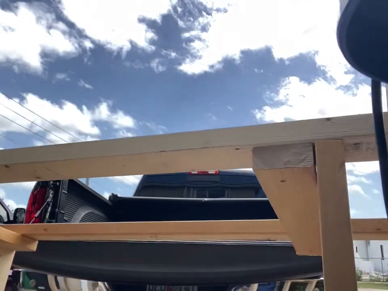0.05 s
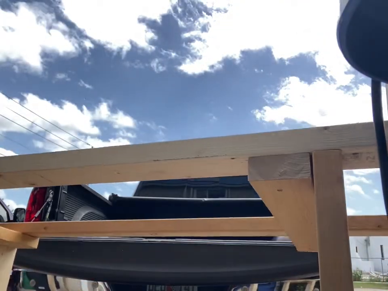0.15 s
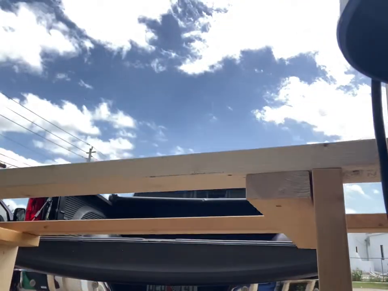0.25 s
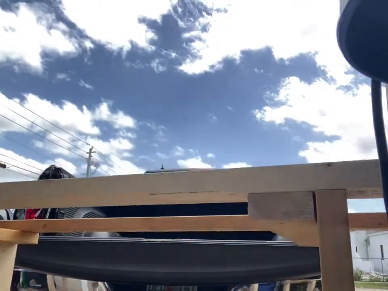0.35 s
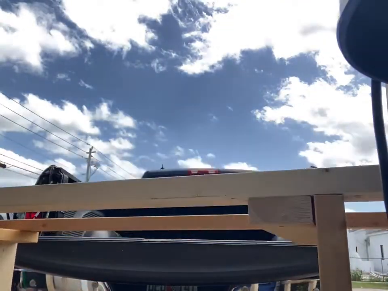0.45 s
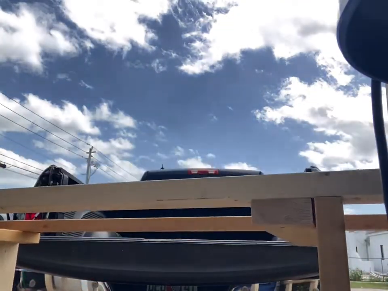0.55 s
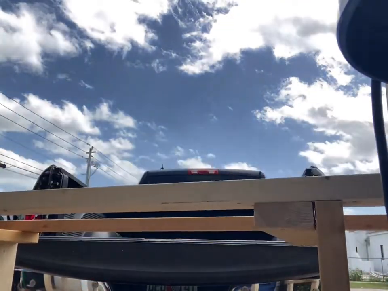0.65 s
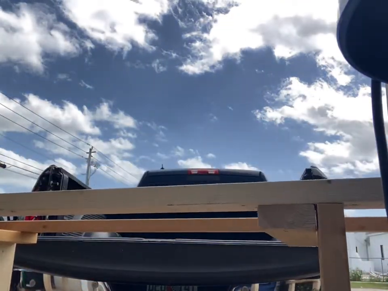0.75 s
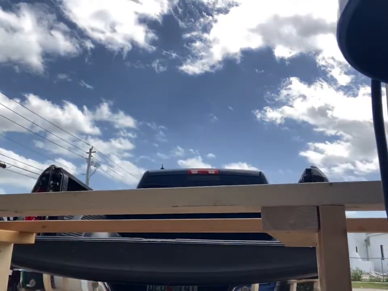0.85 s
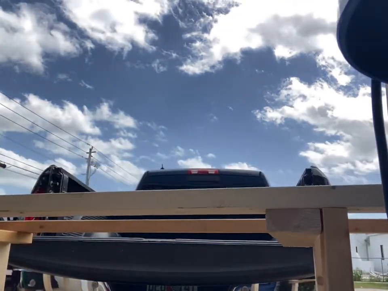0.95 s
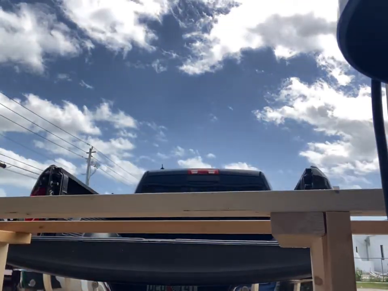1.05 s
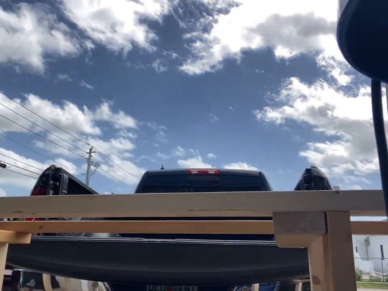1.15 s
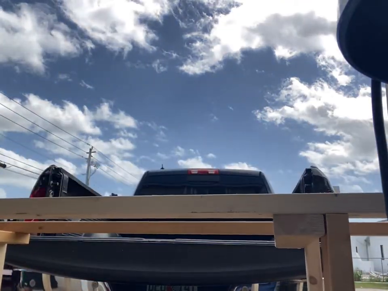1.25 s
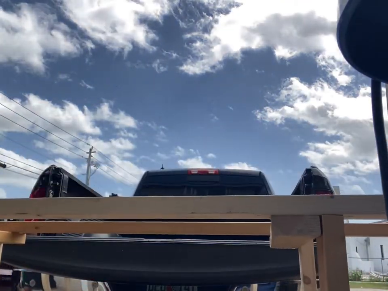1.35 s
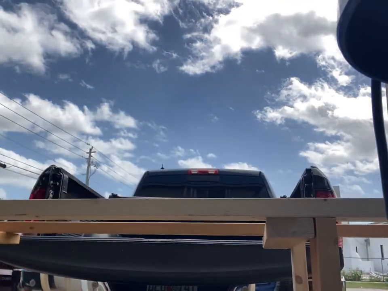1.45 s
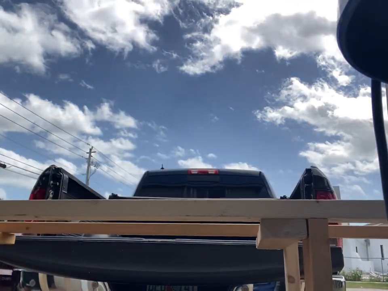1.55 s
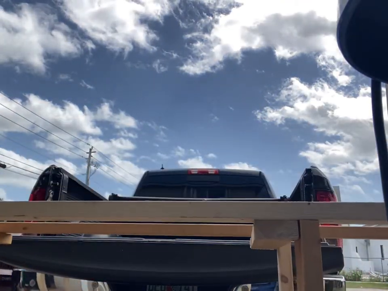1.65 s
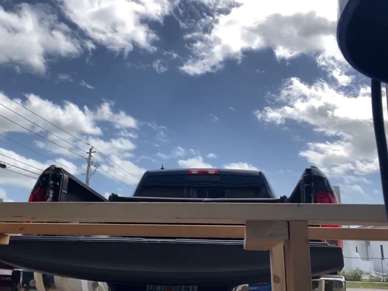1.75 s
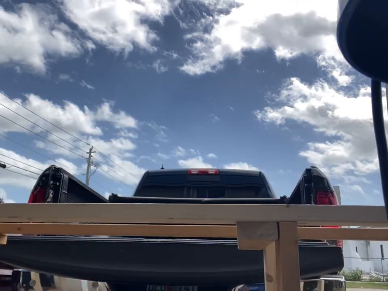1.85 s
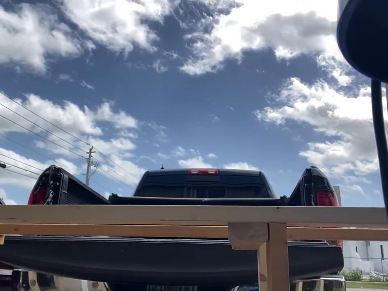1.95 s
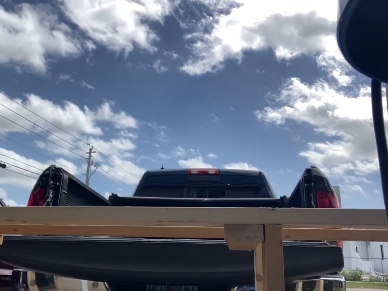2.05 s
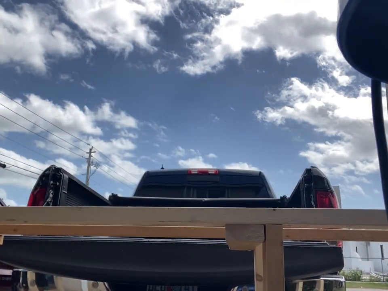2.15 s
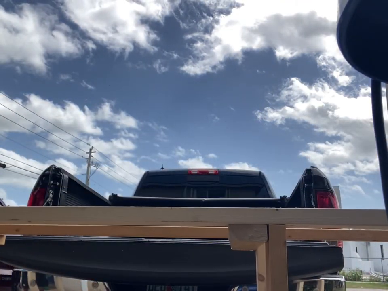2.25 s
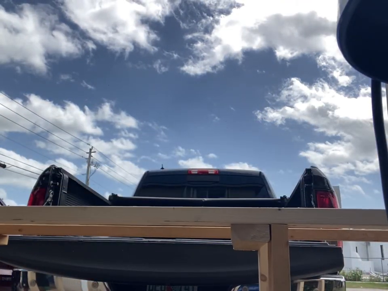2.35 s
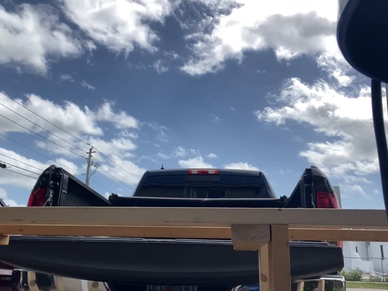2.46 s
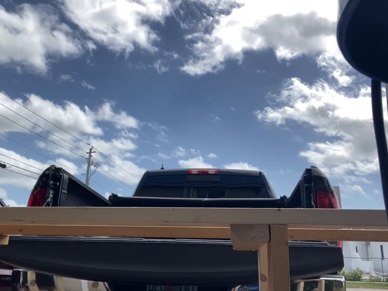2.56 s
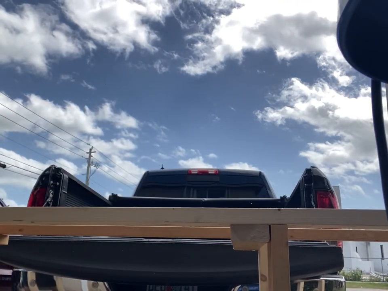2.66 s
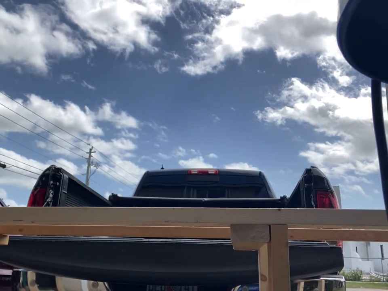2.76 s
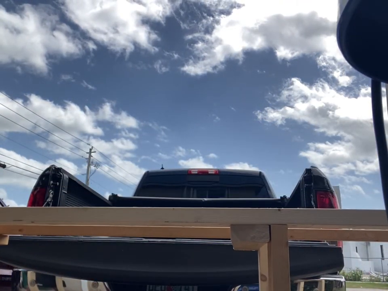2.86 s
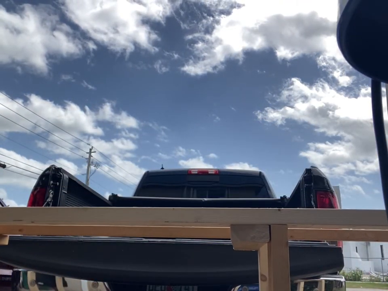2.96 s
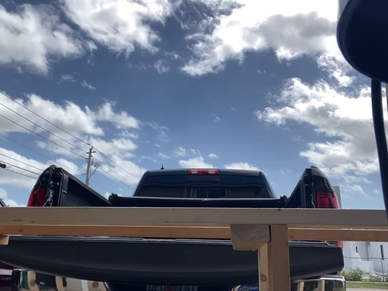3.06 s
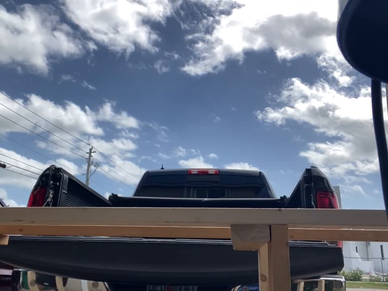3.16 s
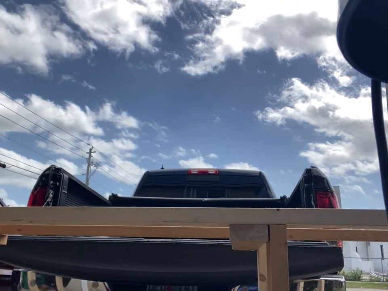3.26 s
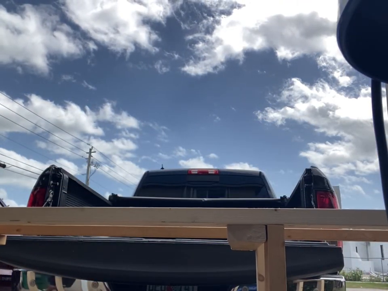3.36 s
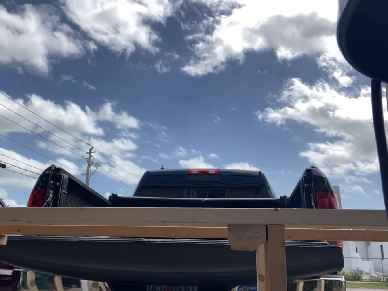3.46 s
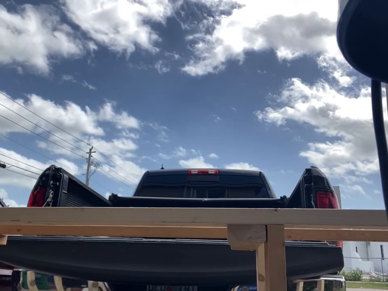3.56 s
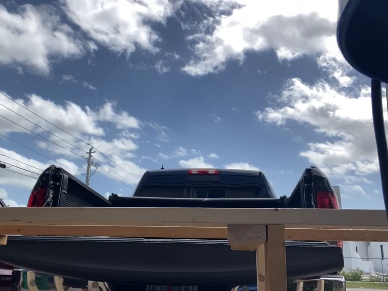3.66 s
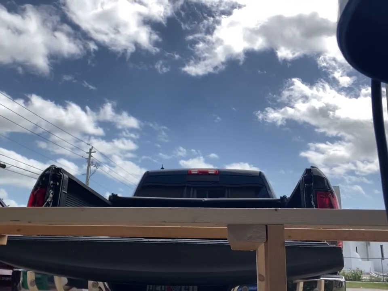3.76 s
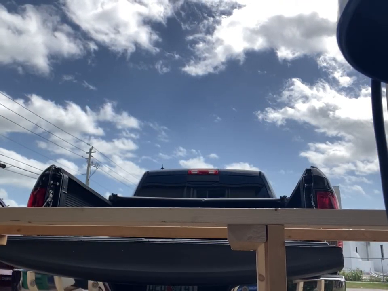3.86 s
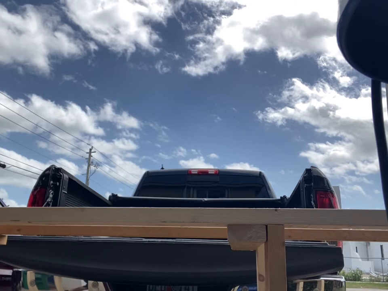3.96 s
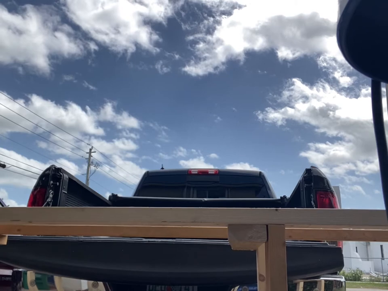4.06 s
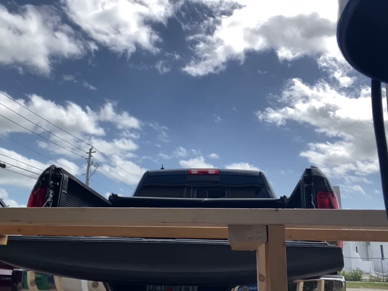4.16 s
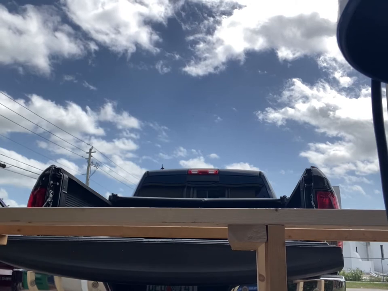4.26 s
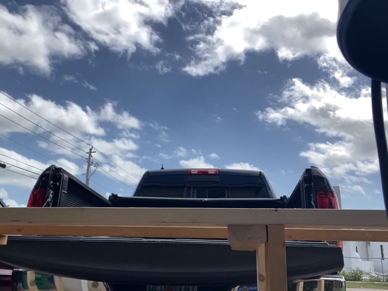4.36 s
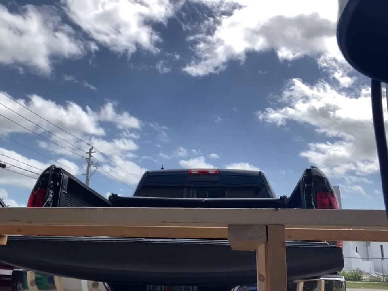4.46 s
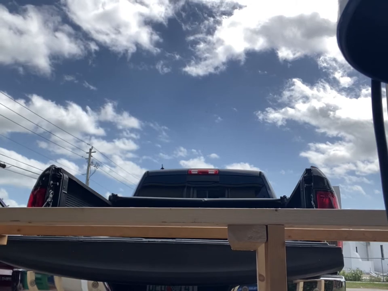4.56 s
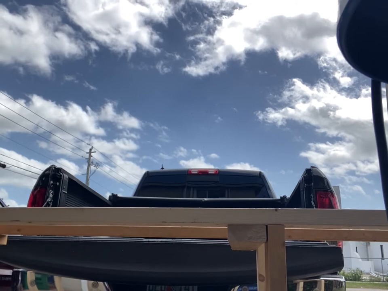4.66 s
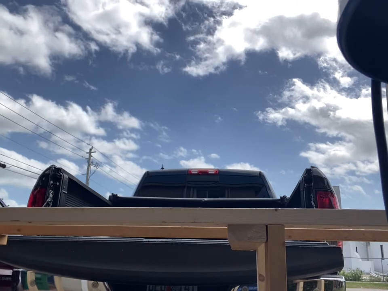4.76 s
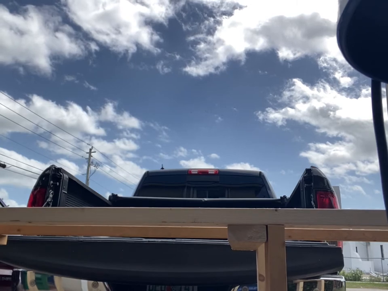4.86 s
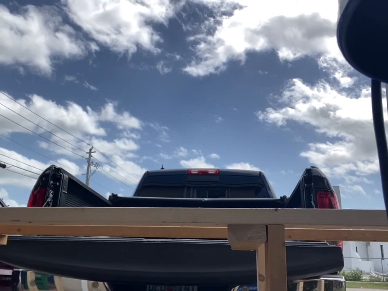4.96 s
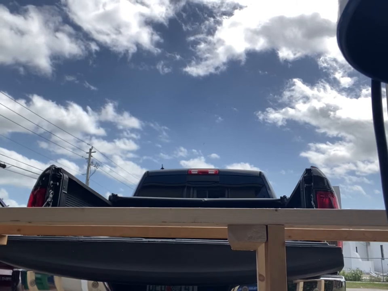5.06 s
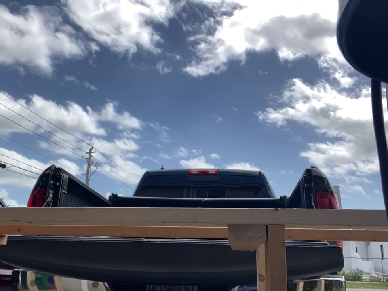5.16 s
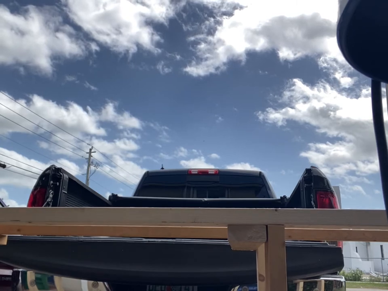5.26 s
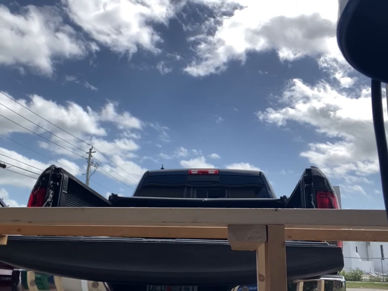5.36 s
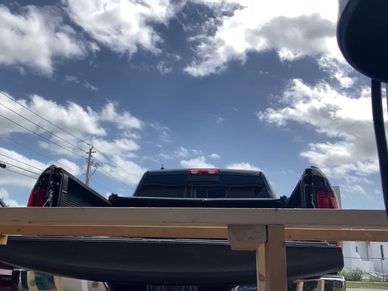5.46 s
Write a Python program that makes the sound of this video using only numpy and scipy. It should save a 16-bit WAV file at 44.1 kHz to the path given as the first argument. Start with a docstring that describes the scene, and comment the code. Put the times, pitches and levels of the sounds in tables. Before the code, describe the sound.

Outdoors over a low engine hum, timber bangs and rattles sharply, falls quiet, then gives a brief softer cluster of knocks.

```python
"""In a yard beside an idling engine, a timber frame is lowered from a truck's tailgate and settles in knocks.
After a pause it is nudged once more; something small and hard taps close to the microphone.
Blows are shaped noise plus decaying board modes over a hollow thud; taps are short rings with a noise tick.
Scrapes are trains of tiny blows, bumps are dull low rings, and the engine is a few wavering sines.
The steady outdoor wash is filtered noise whose bands swell separately."""
import sys
import numpy as np
from scipy import signal
from scipy.fft import rfft, irfft, next_fast_len
from scipy.io import wavfile
from scipy.ndimage import uniform_filter1d

SR = 44100
rng = np.random.default_rng(int(sys.argv[2]) if len(sys.argv) > 2 else 0)


def generate_wav(signal):
    """Clip the signal to [-1, 1] and save it as 16-bit WAV at the path in sys.argv[1]."""
    frames = np.transpose(np.atleast_2d(signal))
    scaled = np.clip(frames, -1, 1) * 32767
    pcm = np.round(scaled).astype(np.int16)
    wavfile.write(sys.argv[1], SR, pcm)


N = 242983
TIME = np.arange(N) / SR

# engine tones: pitch_hz, level_db (rms before swell, throb and port balance)
ENGINE_TONES = [(78.3, -47), (116.5, -44.5), (158, -48.5), (236, -47)]
# swell of the engine's highest tone: time_s, gain_db
HIGH_TONE_SWELL = [(0, -1.5), (2.3, -1.5), (2.55, 3.5), (3.2, 3), (3.9, 1), (4.6, 2), (5.1, -10.5),
                   (5.5, 0)]
# spectrum of the exhaust rumble: frequency_hz, relative_density_db (per Hz)
EXHAUST_SPECTRUM = [(12, -56), (22, -39), (36, -7), (55, 0), (70, 2), (118, -4), (140, -5), (190, -3),
                    (240, -4.5), (290, -7.5), (400, -12), (780, -55), (2000, -97.5)]
# spectrum of the airy wash: frequency_hz, relative_density_db (per Hz)
AIR_SPECTRUM = [(250, -4.5), (410, -0.5), (520, 2), (630, 4), (780, 1), (1100, 0), (1650, -2.5),
                (2000, -10.5), (2400, -15.5), (4200, -21.5), (6000, -25.5), (7800, -26.5), (9400, -33.5),
                (13000, -39.5), (14200, -56), (16000, -80)]
# slow swells of the wash bands: time_s, deep_rumble_db, upper_rumble_db, low_middle_db, middle_db (gains)
WASH_SWELLS = [(0, -39, -36.5, -34.5, -33.5), (.6, -34.5, -40, -34, -34.5), (1.4, -34.5, -35, -36.5, -35.5),
               (1.95, -36, -39, -32.5, -31), (2.35, -35, -38.5, -37, -39), (2.9, -37.5, -32.5, -35, -36.5),
               (3.25, -35, -39.5, -35, -36), (3.6, -36, -37.5, -34.5, -35),
               (3.85, -36.5, -38.5, -35, -37.5), (4.35, -39, -38.5, -37.5, -38),
               (4.8, -37.5, -38.5, -36.5, -39.5), (5.15, -39, -39.5, -37.5, -41.5),
               (5.5, -38, -40, -38, -40)]
# wash at the two ports: frequency_hz, likeness (0 to 1)
WASH_LIKENESS = [(30, 0.48), (170, 0.79), (400, 0.6), (600, 1), (1100, 0.2), (1600, 0.6), (2200, 0.09),
                 (7500, 0.14), (9300, 1), (13000, 0.83)]
# wash at the two ports: frequency_hz, left_minus_right_db
WASH_LEAN = [(30, 0.5), (230, 4), (480, -3.5), (1100, 5.5), (1900, 2.5), (4600, 6.5), (6100, 3), (7800, 4),
             (9200, -1)]
# wash at the two ports: frequency_hz, left_lead_rad
WASH_PHASE = [(0, 0), (200, 0.27), (600, 2.5), (800, 3.5), (1460, 1.83), (1900, 2), (3620, -4.5),
              (6120, -10.5), (6600, -10), (7580, -16.5), (8800, -18.5), (9900, -16), (11100, -12.5),
              (13000, -11.5)]
# frame at the two ports: frequency_hz, likeness (0 to 1)
FRAME_LIKENESS = [(100, 1), (400, 0.53), (7000, 0.12), (9300, 0.99), (13000, 0.27)]
# frame at the two ports: frequency_hz, left_minus_right_db
FRAME_LEAN = [(260, 10), (450, -2), (900, -1.5), (1400, 2), (2700, 1.5), (4000, 3.5), (5200, 4.5),
              (6500, -1), (7500, 2.5), (12000, -1)]
# frame at the two ports: frequency_hz, left_lead_rad
FRAME_PHASE = [(50, 0.2), (400, 0), (750, 2.5), (1400, 2.5), (2500, .5), (4200, -3.5), (5200, -8),
               (6200, -12.5), (9300, -8.5), (12000, 0), (13200, -14), (14000, -4)]
# blows on the frame: start_s, strength_db, extra_crack_db,
# thud_weight_db (relative to the blow, before the thud gain), thud_pitch_hz, contact_rise_s
KNOCKS = [(0.2456, -16, 5.5, -6.5, 392, 0.0018), (0.3437, -8, 3.5, -12.5, 470, 0.0014),
          (0.401, -26.5, 0, -12, 630, .002), (0.422, -25, -7, -15, 660, .002),
          (0.45, -26.5, 3, -24, 600, .003), (0.478, -20.5, -3, -13, 470, 0.0037),
          (0.5961, -15.5, -3.5, -20.5, 519, .004), (0.6104, -20, 1, -6.5, 626, 0.003),
          (0.797, -30, 2, -11, 560, .003), (0.8945, -18, 7.5, -11.5, 560, 0.0023),
          (0.982, -16, -0.5, -7.5, 397, 0.0012), (1.3553, -23.5, 6.5, -11, 620, 0.00098),
          (1.4663, -19.5, -10, 1.5, 484, 0.0025), (1.4864, -20, 2.5, -5, 603, 0.0065),
          (1.7789, -17.5, 9, -19, 434, 0.0013), (1.9108, -14, 3.5, -19.5, 496, .003),
          (1.928, -13, 4, -17.5, 649, 0.0021), (3.341, -38.5, -2, 1, 593, .003),
          (4.0004, -33, 21.5, -5, 282, .003), (4.0148, -27.5, -10, 1.5, 446, .004),
          (4.0471, -25, -3, -7, 580, 0.0045), (4.088, -18, 3, -10.5, 430, 0.0017),
          (4.126, -29.5, -2, -6.5, 434, 0.0022), (4.149, -31, 3, -10, 560, .002),
          (4.219, -32.5, 7, -10, 510, 0.0023), (4.283, -36.5, -9, -15, 450, 0.0026)]
# resonances of the boards: pitch_hz, relative_level_db, t60_s
BOARD_MODES = [(171, -7, 0.16), (503, -5, 0.14), (637, -7.5, 0.34), (982, -5, 0.18), (1104, -1, 0.23),
               (1666, -6, 0.11), (1857, -1.5, 0.13), (2037, 1.5, 0.091), (2737, -2, 0.085),
               (2980, -4, 0.055), (3270, -7, 0.13), (3850, -12, 0.23), (4220, -9, 0.14), (4300, -8, 0.16),
               (4660, -5, 0.16), (5350, -8, .14), (5700, -15, .13), (6190, -12, 0.079), (6660, -3, 0.088),
               (6900, -4, 0.097)]
# the wood's dense ring between those resonances: frequency_hz, relative_density_db (per Hz)
WOOD_SPECTRUM = [(60, -19), (160, 11.5), (450, 13.5), (750, 10.5), (1100, 7.5), (1650, 5.5), (2400, 0.5),
                 (4200, 4), (5300, 1), (6800, -1), (8200, -4.5), (9400, -22), (11000, -13), (13500, -29),
                 (16000, -44)]
# soft, dull bumps: start_s, level_db, pitch_hz, t60_s
BUMPS = [(.358, -23.5, 194, 0.16), (1.003, -22, 344, 0.093), (1.01, -23, 174, 0.17),
         (1.29, -26.5, 115.7, 0.67), (2.02, -34, 378, 0.069), (3.343, -35, 330, 0.081),
         (4.553, -27.5, 240, 0.11)]
# close taps: start_s, ring_db (before port gains), ring_pitch_hz, overtone_pitch_hz,
# overtone_db (relative to the ring), body_db (relative to the ring), tick_db (gain), jolt_db (strength)
TAPS = [(0.4876, -19.5, 975, 2000, -9, -7, -52, -28.5), (0.617, -26.5, 1054, 1480, -7, 0, -51, -27),
        (0.699, -22.5, 995, 2000, -8, -4, -61, -26), (0.716, -25.5, 985, 2020, -10, 0, -54, -26.5),
        (0.812, -26.5, 1010, 1680, -8, -6, -58, -31.5), (0.905, -16.5, 980, 1690, -10, -7, -46, -22.5),
        (0.984, -19, 1035, 1660, -9, 1, -46, -27), (1.054, -25.5, 1002, 1980, -12, 0, -58, -29),
        (1.188, -26.5, 1000, 2050, -14, -10, -68, -30), (1.361, -26.5, 1078, 1610, -2.5, -1, -54, -34),
        (1.454, -23.5, 960, 1710, -9, -5, -56, -27), (1.466, -19.5, 925, 1690, -12, -3, -50, -23),
        (1.501, -17.5, 1004, 1390, -12, -7, -47.5, -25), (1.665, -18, 990, 1610, -13, -15, -49, -26),
        (1.7166, -24, 1000, 1860, -20, 1.5, -50, -23.5), (1.791, -14, 1007, 2050, -17, -7.5, -44, -26),
        (1.875, -18, 1035, 2070, -18, -4, -47.5, -27), (1.931, -30, 1080, 2070, 7, -8, -50, -29),
        (1.949, -21, 1063, 2080, -8, -15, -58, -27), (1.962, -22.5, 1090, 1880, -10, -14, -60, -27),
        (2.043, -29.5, 1020, 2050, -11, -4, -66, -30), (2.117, -29, 1035, 1610, -16, -9, -60, -28),
        (2.258, -28.5, 1100, 1700, -11, -9, -68, -33.5), (4.004, -45, 910, 1780, -6, 9, -47, -40),
        (4.056, -24, 1080, 1500, -5, -16, -55, -31), (4.091, -22, 1115, 1630, -5, -19, -53, -24),
        (4.159, -24.5, 990, 1640, -7.5, -8, -53, -27)]
# spectrum of a tap's snap: frequency_hz, relative_density_db (per Hz)
TICK_SPECTRUM = [(200, 4), (700, 21), (1500, 16), (3000, 14), (6000, 2.5), (8200, 6.5), (9600, -4),
                 (11000, 2), (13300, 0.5), (15800, -19)]
# wood dragging on wood: start_s, length_s, level_db (rms before the ports), treble_db
SCRAPES = [(1.913, 0.081, -37.5, -3), (4.011, .075, -43.5, -21)]


def amp(db):
    """Decibel definition: 20 dB is a tenfold amplitude ratio."""
    return 10 ** (np.asarray(db) / 20)


def evened(x):
    """Power normalisation: scales to rms 1."""
    return x / np.sqrt(np.mean(x ** 2) + 1e-20)


def read(points, hz):
    """Logarithmic interpolation: joins (Hz, value) points on a log-frequency axis."""
    f, value = np.transpose(points)
    return np.interp(np.log(hz + 1), np.log(f + 1), value)


def add(mix, s, sound):
    """Superposition: mixes a stereo sound in at time s."""
    part = mix[:, max(round(s * SR), 0):][:, :sound.shape[1]]
    part += sound[:, :part.shape[1]]


def colour(x, points, size=2048):
    """Minimum phase: a causal filter whose phase follows from its (Hz, dB) response."""
    log_gain = np.log(amp(read(points, abs(np.fft.fftfreq(size, 1 / SR)))))
    response = np.exp(np.conj(signal.hilbert(log_gain)))
    impulse = np.fft.ifft(response).real
    return signal.oaconvolve(x, impulse[None], axes=1)[:, :x.shape[1]]


def drift(rate_hz, size=N):
    """Band-limited randomness: noise under a Gaussian low-pass, rms 1."""
    n = next_fast_len(size)
    spectrum = rfft(rng.standard_normal(n))
    lowpass = np.exp(-(np.fft.rfftfreq(n, 1 / SR) / rate_hz) ** 2)
    return evened(irfft(spectrum * lowpass, n)[:size])


def split(x, hz):
    """Complementary bands: zero-phase parts below and above hz that sum to the input."""
    below = signal.sosfiltfilt(signal.butter(3, hz, fs=SR, output="sos"), x)
    return below, x - below


def ports(pair, likeness, phase, lean):
    """Partial coherence: two unrelated signals become what two microphone ports pick up."""
    hz = np.fft.rfftfreq(N, 1 / SR)
    shared, separate = rfft(pair)
    same = np.clip(read(likeness, hz), 0, 1)
    lean_db = read(lean, hz)
    left = shared * np.exp(1j * np.interp(hz, *np.transpose(phase))) * amp(lean_db / 2)
    right = (same * shared + np.sqrt(1 - same ** 2) * separate) * amp(-lean_db / 2)
    return irfft(np.array([left, right]), N)


def at_frame(pair):
    """Spatial coherence of the frame's sound across the two ports."""
    return ports(pair, FRAME_LIKENESS, FRAME_PHASE, FRAME_LEAN)


def idle(wander=0.01187, throb_db=3.0, left_lead_s=0.00046):
    """Additive tones with random frequency and amplitude modulation, arriving first at the left port."""
    hum = np.zeros((2, N))
    swells = [0] * (len(ENGINE_TONES) - 1) + [np.interp(TIME, *np.transpose(HIGH_TONE_SWELL))]
    for (hz, db), swell_db in zip(ENGINE_TONES, swells):
        clock = np.cumsum(1 + wander * drift(6.0)) / SR + np.array([[left_lead_s], [0]])
        strength = np.sqrt(2) * amp(db + swell_db + throb_db * drift(10.7))
        hum += strength * np.sin(2 * np.pi * (hz * clock + rng.random()))
    return hum * amp([[.4], [-.6]])


def port_noise(points):
    """Filtered random noise: the outdoor spectrum at both ports, rms 1."""
    noise = colour(rng.standard_normal((2, N)), points, size=8192)
    return evened(ports(noise, WASH_LIKENESS, WASH_PHASE, WASH_LEAN))


def waver(x, depth_db=2.0):
    """Time-frequency modulation: narrow patches swell and fade, each on its own."""
    z = signal.stft(x, nperseg=1024, noverlap=768)[2]
    patches = rng.standard_normal(z[0].T.shape)
    patches = uniform_filter1d(patches, size=14, axis=0)  # over time frames
    patches = uniform_filter1d(patches, size=4, axis=1)  # over frequency bins
    gain = evened(amp(depth_db * evened(patches)))
    return signal.istft(z * gain.T, nperseg=1024, noverlap=768)[1][:, :N]


def outdoors(deep_swell_db=1.65, upper_swell_db=1.46, flutter_db=0.8, hiss_db=-53):
    """Band-wise modulation of noise: exhaust rumble and the airy wash of the yard."""
    s, *curves = np.transpose(WASH_SWELLS)
    deep_db, upper_db, low_db, middle_db = [np.interp(TIME, s, curve) for curve in curves]
    deep, upper = split(port_noise(EXHAUST_SPECTRUM), 113)
    rumble = deep * amp(deep_db + deep_swell_db * drift(10.0))
    rumble += upper * amp(upper_db + upper_swell_db * drift(5.1))
    air, hiss = split(port_noise(AIR_SPECTRUM), 2345)
    low, middle = split(evened(waver(air)), 890)
    wash = low * amp(low_db) + middle * amp(middle_db) + evened(hiss) * amp(hiss_db)
    return rumble + wash * amp(flutter_db * drift(12.4))


def knock(body_db, thud_db, crack_db, rise, t60, snap_db=10, snap_t60=0.018, dense_db=-1, modes_db=-9.5,
          yard_db=-19, yard_t60=0.67, bass_rise=0.0026, treble_life=0.94, chatter_db=1.0, grit_db=-1.5,
          grit_per_s=240):
    """Impact excitation of damped modes: a snap, a chattering ring, a faint tail off truck and yard."""
    t = np.arange(SR // 2) / SR
    low, high, sharp = rng.standard_normal((3, 2, len(t)))
    # the rough faces catch in tiny separate clicks
    grit = (rng.random(len(t)) < grit_per_s / SR) * rng.choice([-1, 1], high.shape)
    high = evened(high + amp(grit_db) * evened(grit))
    tail = amp(yard_db - 60 * t / yard_t60)
    # slow bending waves build up later and last longer than the treble
    bass = signal.lfilter(*signal.butter(2, 1600, fs=SR), low)
    bass *= (amp(-60 * t / t60) + tail) * (1 - np.exp(-t / bass_rise))
    treble = signal.lfilter(*signal.butter(2, 1600, "high", fs=SR), high)
    treble *= amp(-60 * t / (t60 * treble_life)) + tail
    snap_tilt = [(500, -14.5), (1500, -9.5), (3000, 3.5), (5300, 1), (8000, -5)]  # Hz, dB
    snap = colour(sharp * amp(snap_db - 60 * t / snap_t60), snap_tilt)
    # loose joints touch again and again while the frame shakes
    chatter = amp(chatter_db * drift(280, size=len(t)))
    dense = colour((bass + treble) * chatter + snap, WOOD_SPECTRUM)
    hz, db, mode_t60 = np.transpose(BOARD_MODES)[:, :, None]
    phase = rng.random((2, len(BOARD_MODES), 1))
    modes = (amp(db - 60 * t / mode_t60) * np.sin(2 * np.pi * (hz * t + phase))).sum(1)
    blow = (amp(dense_db) * dense + amp(modes_db) * modes) * (1 - np.exp(-t / rise))
    # where and how hard the wood meets sets the weight of thud and crack
    return colour(blow, [(450, thud_db), (1000, body_db - 1.5), (3000, body_db - 4.5), (6000, crack_db + 0.5)])


def strike(db, rise, extra_crack_db=0, weight_db=-14, wood_t60=0.2):
    """Nonlinear contact: a harder blow is brighter and snaps more, and its snap lasts longer."""
    crack_db = -9 + 1.43 * db + extra_crack_db
    snap_db = 18.5 + 0.95 * db
    snap_t60 = 0.071 * amp(db) ** 0.61
    return knock(db, db + weight_db, crack_db, rise, wood_t60, snap_db, snap_t60)


def hollow(hz, t60, halo_db, halo_t60, halo_width, rise):
    """Damped resonance: one short ring, its pitch blurred by reflections over relative width halo_width."""
    t = np.arange(SR // 3) / SR
    phase = rng.random() + rng.uniform(-.2, .2, (2, 1))  # cycles
    tone = np.sin(2 * np.pi * (hz * t + phase)) * amp(-60 * t / t60)
    edges = [hz / (1 + halo_width), hz * (1 + halo_width)]
    band = signal.butter(2, edges, "band", fs=SR, output="sos")
    halo = evened(signal.sosfilt(band, rng.standard_normal((2, len(t)))))
    halo *= amp(halo_db - 60 * t / halo_t60)
    return (tone + halo) * (1 - np.exp(-t / rise))


def frame_knocks(thud_gain_db=4, rock_s=.104, rock_spread_s=.005, rock_db=-17, bend_ratio=1.725, bend_db=-10.5):
    """Modal impact and rebound: each blow rings boards over a hollow thud; the frame rocks back softly."""
    wood, thuds = np.zeros((2, 2, N))
    for s, db, extra_crack_db, weight_db, hz, rise in KNOCKS:
        add(wood, s, strike(db, rise, extra_crack_db, weight_db))
        rock_at = s + rock_s + rock_spread_s * rng.standard_normal()
        add(wood, rock_at, strike(db + rock_db, rise=.004))
        thud = hollow(hz, t60=0.066, halo_db=-5, halo_t60=0.13, halo_width=0.47, rise=0.0016)
        # second bending mode of the thud
        bend = hollow(hz * bend_ratio, t60=0.021, halo_db=3.5, halo_t60=0.13, halo_width=0.095, rise=0.00064)
        add(thuds, s, amp(db + weight_db + thud_gain_db) * (thud + amp(bend_db) * bend))
    return at_frame(wood) + thuds


def bumps():
    """Low damped resonance: dull rings with a soft start."""
    out = np.zeros((2, N))
    for s, db, hz, t60 in BUMPS:
        add(out, s, amp(db) * hollow(hz, t60, halo_db=-3.5, halo_t60=.15, halo_width=0.27, rise=0.0023))
    return out


def tick(snap_db=7, t60=0.035, tail_db=-16, tail_t60=0.25):
    """Broadband transient: the bright snap that starts a tap, and its scatter."""
    t = np.arange(SR // 4) / SR
    dying = amp(-60 * t / t60) + amp(tail_db - 60 * t / tail_t60)
    return amp(snap_db) * colour(rng.standard_normal((2, len(t))) * dying, TICK_SPECTRUM)


def close_taps(left_db=3, right_db=5, bounce_s=.011, bounce_db=-7, body_ratio=0.755, jolt_rise_s=0.0036):
    """Position-dependent resonance: each tap ticks, rings by where it lands, bounces once, jolts the boards."""
    wood, rings = np.zeros((2, 2, N))
    for s, db, hz, overtone_hz, overtone_db, body_db, tick_db, jolt_db in TAPS:
        add(wood, s, strike(jolt_db, jolt_rise_s, extra_crack_db=-3.5, weight_db=-6.5))
        for at, touch_db in (s, 0), (s + bounce_s, bounce_db):
            ring = hollow(hz, t60=0.039, halo_db=-12.5, halo_t60=0.13, halo_width=0.085, rise=0.0004)
            body = hollow(hz * body_ratio, t60=0.019, halo_db=-8.5, halo_t60=0.11, halo_width=0.28, rise=.0009)
            overtone = hollow(overtone_hz, t60=0.038, halo_db=-10, halo_t60=0.12, halo_width=.08, rise=0.00099)
            add(wood, at, amp(tick_db + touch_db) * tick())
            add(rings, at, amp(db + touch_db) * (ring + amp(body_db) * body + amp(overtone_db) * overtone))
    return at_frame(wood) + rings * amp([[left_db], [right_db]])


def scrapes(skew=0.33, slips_per_s=180):
    """Stick-slip friction: uneven slips, each a tiny blow on the boards, build up quickly and thin out."""
    wood = np.zeros((2, N))
    for s, length, db, treble_db in SCRAPES:
        u = np.arange(0, 1, 1 / (length * SR))
        slips = (rng.random(len(u)) < slips_per_s / SR) * rng.standard_normal(len(u))
        slips *= np.sin(np.pi * u ** skew)
        slip = knock(body_db=2.5, thud_db=-25, crack_db=treble_db, rise=0.00044, t60=.04, modes_db=-21)
        drag = signal.oaconvolve(slips[None], slip, axes=1)
        add(wood, s, amp(db) * drag / (drag[:, :len(u)].std() + 1e-9))
    return at_frame(wood)


def scene():
    """Superposition of sources: idle and wash under knocks, bumps, taps and scrapes."""
    return idle() + outdoors() + frame_knocks() + bumps() + close_taps() + scrapes()


def record(dry, ceiling_db=-4, edge_hz=15800):
    """Saturation and band limiting: the recorder rounds off peaks near its ceiling and cuts the top."""
    rounded = dry / (1 + (dry / amp(ceiling_db)) ** 4) ** .25
    lowpass = signal.firwin(511, edge_hz, window=("kaiser", 9), fs=SR)
    return signal.oaconvolve(rounded, lowpass[None], "same")


dry = scene()
out = record(dry)
generate_wav(out)
```